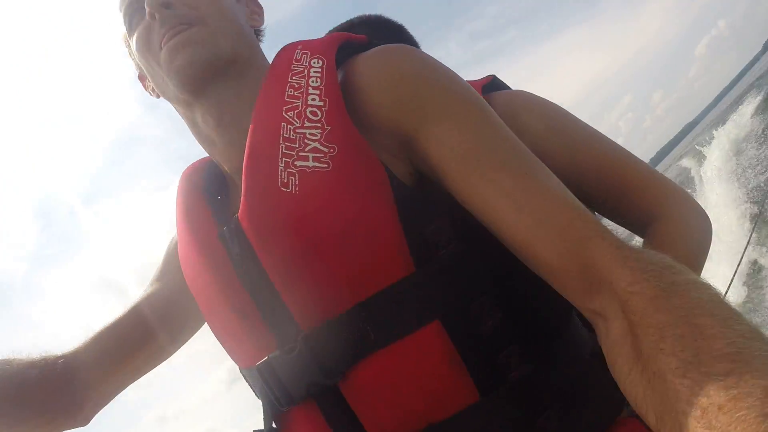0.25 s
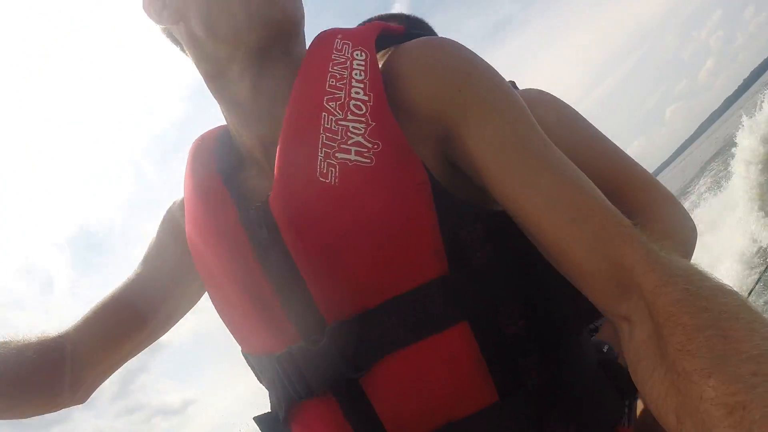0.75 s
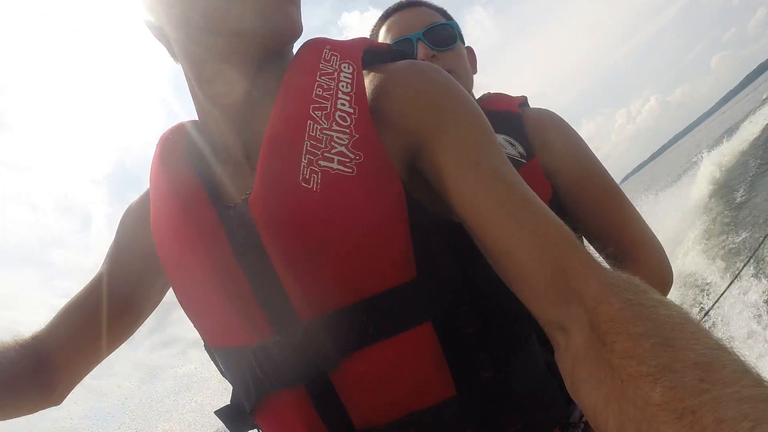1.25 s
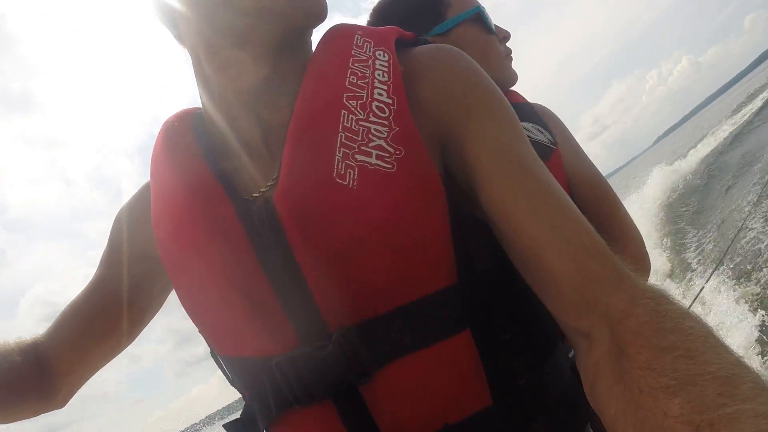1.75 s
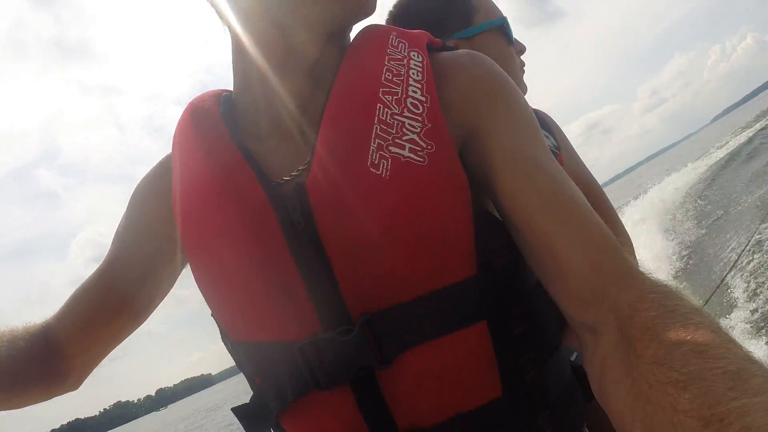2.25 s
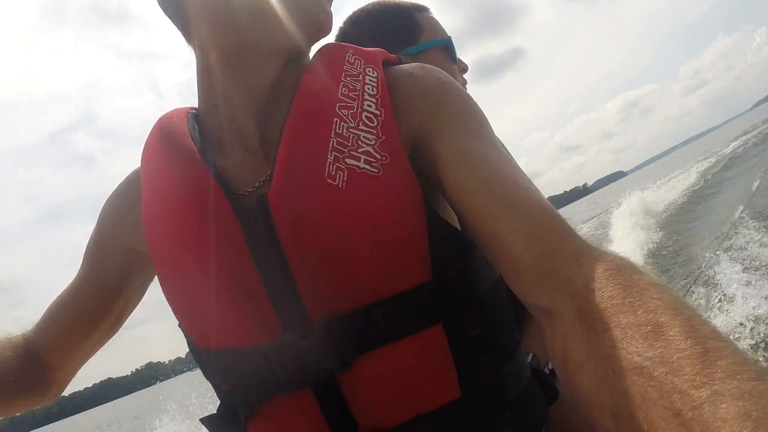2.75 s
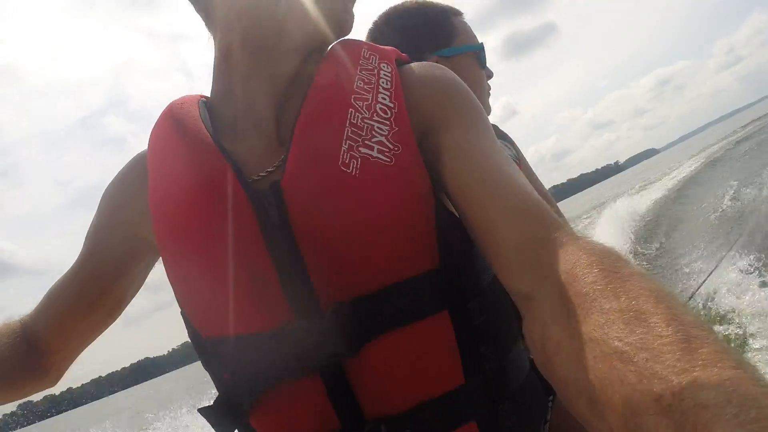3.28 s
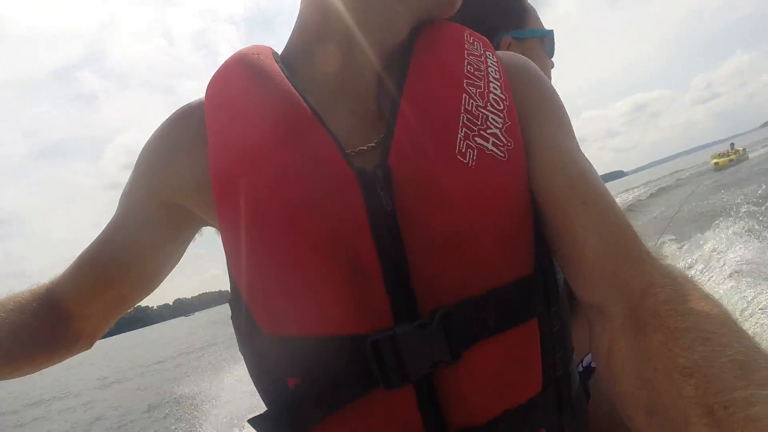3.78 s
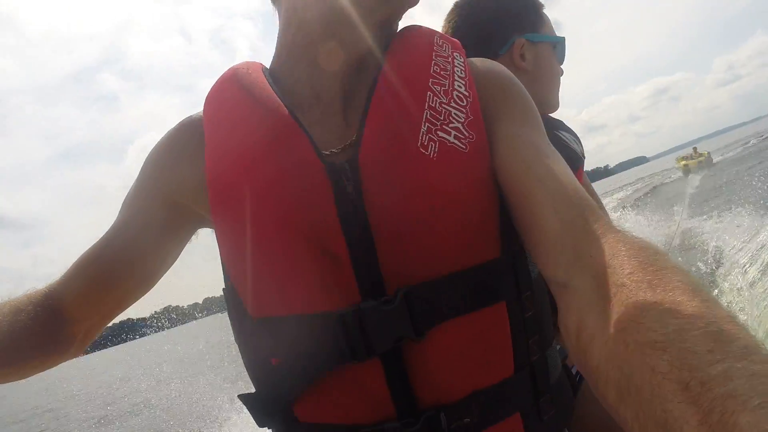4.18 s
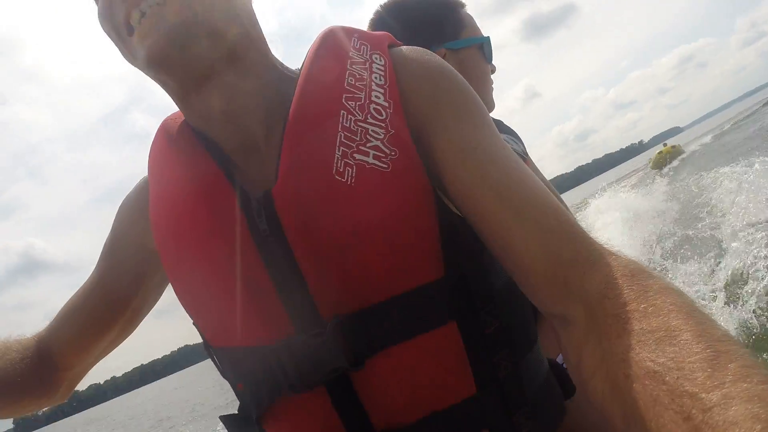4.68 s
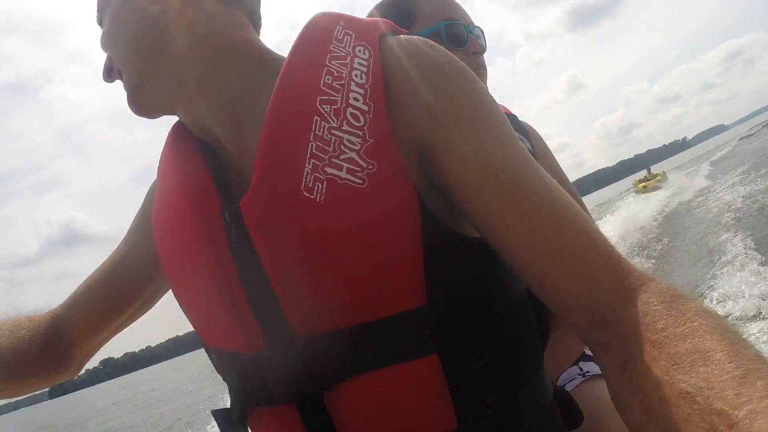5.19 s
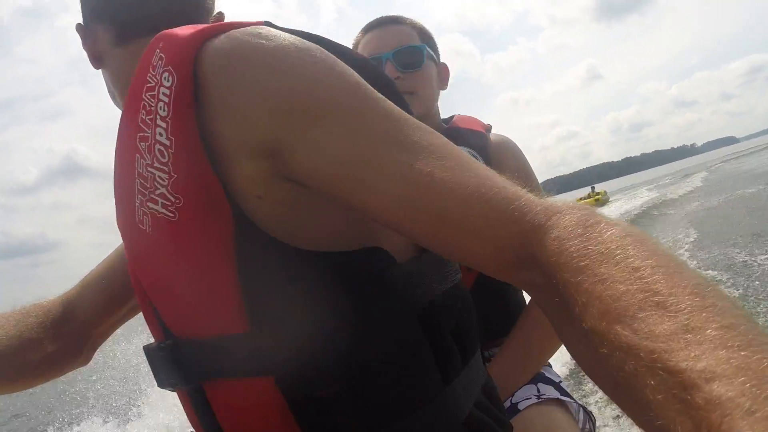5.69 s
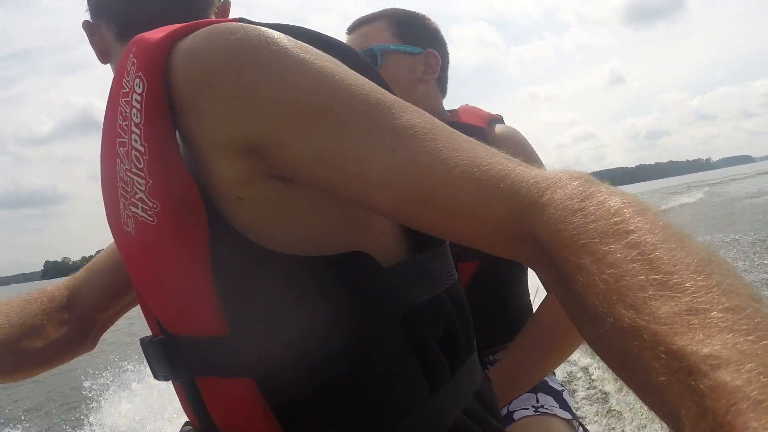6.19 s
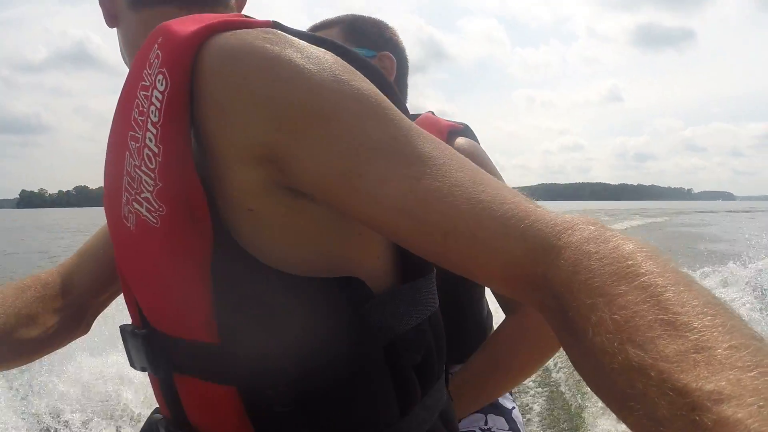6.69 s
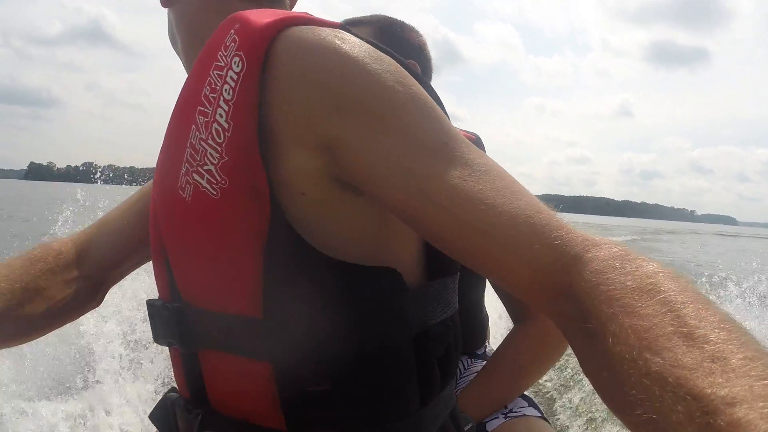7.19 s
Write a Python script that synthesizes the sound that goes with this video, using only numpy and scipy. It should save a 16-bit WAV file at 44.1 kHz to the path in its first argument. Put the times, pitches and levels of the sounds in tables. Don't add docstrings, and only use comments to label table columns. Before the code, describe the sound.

A rough, uneven water scooter engine growls at speed across a lake, its pitch wavering as hull panels boom, the mount rattles and wind thumps.

```python
import sys
import numpy as np
from scipy import signal
from scipy.fft import rfft, irfft
from scipy.io import wavfile
from scipy.ndimage import uniform_filter1d

SR = 44100
rng = np.random.default_rng(int(sys.argv[2]) if len(sys.argv) > 2 else 0)


def transcribe(u):
    v = np.clip(np.atleast_2d(u).T, -1, 1)
    q = np.round(v * 32767).astype(np.int16)
    wavfile.write(sys.argv[1], SR, q)


def level_to_linear(level):
    exponent = np.asarray(level, float) / 20
    return 10 ** exponent


N = 328104
TIME_S = np.arange(N) / SR

# peak_s, peak_db, half_width_s
GUSTS = [(.36, -18, 0.077), (.8, -15.5, 0.09), (.96, -24, 0.077), (1.58, -20, 0.19), (2.05, -19, 0.062),
         (2.37, -19.5, 0.056), (2.77, -21.5, 0.11), (2.95, -26.5, .04), (3.5, -26, .1), (3.7, -37, 0.052),
         (4.4, -23, 0.14), (4.73, -22, .04), (5.05, -21.5, 0.14), (5.55, -25.5, .12), (6.24, -24.5, .04),
         (6.77, -23, 0.022), (7.0, -28, .12), (7.35, -33, 0.037)]
# freq_hz, level_db (per Hz)
BUFFET_SPECTRUM = [(6, -26.5), (14, 0), (22, -1.5), (36, -3), (60, -21.5), (100, -40.5), (500, -120)]
# time_s, level_db
SPRAY_LEVEL = [(0, -55.5), (.64, -51.5), (.82, -54.5), (1.0, -53), (1.93, -51.5), (2.7, -51.5),
               (2.93, -56.5), (3.19, -53.5), (3.45, -53), (3.58, -54.5), (3.72, -53.5), (4.46, -52),
               (4.75, -53.5), (5.48, -51.5), (5.58, -55), (5.93, -57), (6.3, -54.5), (7.44, -52.5)]
# freq_hz, level_db (per Hz)
SHELL_SPECTRUM = [(2000, -24.5), (2500, 5.5), (3000, 6), (3300, -2.5), (4000, 0.5), (5000, -1),
                  (5800, -4.5), (6300, 1.5), (7200, -6), (8200, -7), (9100, -16), (10200, -12.5),
                  (11500, -17.5), (13200, -18.5), (15200, -30)]

# time_s, case_peak_db, bracket_peak_db, rise_fall_ms
KNOCKS = [(0.376, -45, -27, 4.8), (2.715, -33, -36, 4.4), (4.414, -27.5, -37, 5.75), (4.454, -43, -26, 4),
          (4.478, -37, -25, 2.84), (4.503, -42, -22, 2.1), (5.117, -38, -29, 2.6), (5.334, -45, -37, 2.4),
          (6.552, -27, -25.5, 3.5), (6.579, -17.5, -22, 2.87), (6.592, -24, -22, 3.8),
          (6.634, -34, -28, 5.3)]
# freq_hz, width_hz, level_db
BRACKET_MODES = [(504, 207, -8), (578, 142, -6), (696, 58, -5.5)]
CLAMP_MODES = [(900, 122, -0.5), (1093, 73, 0.5), (1250, 125, -2.5)]
CASE_MODES = [(1826, 163, 4), (2268, 270, -5), (1540, 290, -8), (1947, 100, -7)]
BRACKET_TOP_HZ, CLAMP_TOP_HZ, CASE_TOP_HZ = 800, 1580, 2680

# order, level_db, rise_db_per_hz (of cycle rate)
PANEL_ORDERS = [(7, -13.5, 0), (8, -1.5, 1), (9, -5.5, 0)]
# order, level_db
BRACKET_ORDERS = [(10, -2.5), (11, -7.5), (12, -1.5), (13, -3.5), (14, -8), (15, -7.5), (16, 3.5), (17, 0),
                  (18, -4)]
# freq_hz, level_db (per Hz)
SHUDDER_SPECTRUM = [(40, -28.5), (65, -8), (100, -12), (170, 1.5), (230, -8.5), (280, -9), (350, -8),
                    (420, -24), (1500, -110)]
# rest_db, then dB per dB of load, brightness, boom and spray,
# rise_db_per_hz (of cycle rate), slack_db (while the clamp is loose)
PART_LEVELS = [
    (-29.5, 0.66, 0, 0.88, 0.14, 0.73, -1),
    (-41.5, 0.88, 0, 0.079, .1, -0.5, -1),
    (-38, 0.41, 0.28, 0, 0.29, 0.5, 3.5),
    (-43, 0.3563, 0.64, 0.2, .9, 1, .6),
]

# start_s, length_s, load_db, case_brightness_db, panel_boom_db
WAVES = [(0, 0.324, 11.5, -3, -1.5), (0.527, 0.313, 10.5, 0, -2.5), (0.847, 0.313, 12, 0, -4.5),
         (1.19, 0.376, 0.5, -0.5, 2.5), (1.417, 0.091, 1.5, 3, -2.5), (1.655, 0.11, 8.5, -7, -4),
         (1.963, 0.16, 4, -3, -1), (2.287, 0.21, 5.5, -1, 1.5), (2.503, 0.12, -0.5, -3, 2.5),
         (2.71, 0.19, 8, 0.5, 1), (2.923, 0.13, -4, 2.5, 0), (3.084, 0.062, -0.5, 1, 3),
         (3.253, 0.304, 3.5, 2.5, -2), (3.56, 0.072, -4, 2.5, 0), (3.68, 0.11, 8.5, -2.5, -1.5),
         (3.833, 0.082, -4.5, 0, 6), (4.01, 0.47, 0.5, 3, 1.5), (4.33, 0.2156, 8.5, -2, -0.5),
         (5.054, 0.267, 3.5, -1, 1), (5.51, 0.348, 6, 0, 4), (5.865, 0.277, -2, -0.5, -2),
         (6.453, 0.14, 11.5, -1, 0.5), (6.635, 0.13, 6.5, -2, -1), (6.845, 1, 4.5, 1.5, -2.5)]

# peak_s, peak_db, half_width_s
JOLTS = [(.28, -26.5, 0.083), (.8, -30.5, 0.18), (1.3, -29.5, 0.22), (1.92, -25, 0.11), (2.3, -26, 0.12),
         (2.72, -30, 0.062), (3.0, -32, 0.086), (3.43, -23, 0.1), (3.78, -27.5, 0.26), (4.33, -32, 0.16),
         (5.02, -30.5, .15), (6.4, -31, .15), (6.87, -34.5, .12), (7.2, -29.5, 0.21)]
# freq_hz, level_db (per Hz)
LOW_SHAKE_SPECTRUM = [(25, -42.5), (55, 1.5), (75, 13), (100, 1.5), (140, -31.5), (600, -110)]
# time_s, cycle_rate_hz, level_db, firing_order_lean_db, cylinder_unevenness_db
ENGINE = [(0, 40.4, -14, 0.5, 3.5), (.3, 38.17, -12.5, 2.5, -2.5), (.55, 38.62, -11, 1, -4.5),
          (.85, 40.02, -16.5, 6.5, 2.5), (1.15, 40.75, -14, 2.5, -4), (1.95, 41.48, -12.5, -5.5, -2.5),
          (2.3, 38.98, -9.5, -2.5, -5), (2.7, 37.74, -11, 6, -1), (3.0, 38.72, -13, 3.5, 5),
          (3.5, 38.39, -11, 0, -2.5), (4.05, 39.17, -13, -0.5, 1.5), (4.3, 39.17, -9, 0, -2.5),
          (4.75, 37.68, -10.5, 3, -3), (5.25, 36.81, -11, 4, -2.5), (6.15, 38.5, -13.5, 2, 3),
          (6.4, 38.26, -13, 3.5, 3.5), (7.0, 39.02, -11.5, -2.5, -4), (7.44, 39.54, -11.5, -3, 3)]
# freq_hz, level_db
HULL_RESPONSE = [(110, -12.5), (116, -8), (124, 0), (148, -3), (158, -11), (166, -2.5), (190, -5),
                 (205, -17.5), (222, -7.5), (250, -4.5)]
# peak_s, half_width_s, firing_order_db, order_4_db, order_5_db
GRIP = [(.98, 0.14, -0.5, -12, -7), (1.1, 0.035, 2.5, 3, 9), (2.25, 0.066, 0, -12, -2),
        (2.52, .07, -3.5, 6.5, 4), (3.09, 0.12, -4.5, -11.5, -4), (3.42, 0.09, 4, -5, 2),
        (3.65, 0.082, -10, -6.5, -1), (3.78, 0.056, -8, 6.5, 4.5), (3.93, 0.15, 1.5, -7.5, -3.5),
        (4.5, 0.071, -1, 7.5, -0.5), (4.77, .07, 2, 1.5, -9), (5.19, 0.059, -2.5, 2, -2),
        (5.45, 0.069, 4, 2.5, -3), (5.7, 0.14, -6, -0.5, 0.5), (6.46, 0.07, -5.5, 0.5, -0.5),
        (6.88, 0.14, -1.5, 6, -3.5), (7.14, 0.13, -6, 0.5, -0.5)]
ORDER_LOAD = (0.055, 0.15, 0.35, 0.02)


def unit(x):
    return x / np.sqrt(np.mean(x ** 2))


def curves(table):
    s, *columns = np.transpose(table)
    return [np.interp(TIME_S, s, c) for c in columns]


def walk(rate_hz):
    k = int(SR / rate_hz)
    held = np.repeat(rng.standard_normal(N // k + 1), k)
    slewed = uniform_filter1d(uniform_filter1d(held, k), k)
    return unit(slewed[:N])


def coloured(spectrum):
    hz, db = np.transpose(spectrum)
    log_hz = np.log(np.arange(N // 2 + 1) * SR / N + 1e-3)
    gain = level_to_linear(np.interp(log_hz, np.log(hz), db))
    return unit(irfft(rfft(rng.standard_normal(N)) * gain, N))


def swells(rows, floor_db):
    bells = sum(level_to_linear(db) * np.exp(-((TIME_S - s) / w) ** 2) for s, db, w in rows)
    return 20 * np.log10(level_to_linear(floor_db) + bells)


def wind():
    thump_db = swells(GUSTS, floor_db=-29)
    return level_to_linear(thump_db) * unit(level_to_linear(0.55 * walk(34)) * coloured(BUFFET_SPECTRUM))


def spray(level_db):
    flicker_db = 0.5 * walk(25) + 0.93 * walk(200)
    return level_to_linear(level_db + 2.5) * unit(level_to_linear(flicker_db) * coloured(SHELL_SPECTRUM))


def waves():
    rise_s, fall_s = 0.025, 0.025
    total_db = 0
    for start, length, *db in WAVES:
        ramp = np.minimum((TIME_S - start) / rise_s, (start + length - TIME_S) / fall_s)
        total_db = total_db + np.clip(ramp + 0.5, 0, 1) * np.array(db)[:, None]
    return total_db


def knocks():
    tones_hz = CASE_MODES[0][0], CLAMP_MODES[-1][0], BRACKET_MODES[-1][0]
    case, clamp, bracket = (np.sin(2 * np.pi * hz * TIME_S) for hz in tones_hz)
    hits = 0
    for s, case_db, bracket_db, ms in KNOCKS:
        swell = np.exp(-((TIME_S - s) / (ms / 1000)) ** 2)
        hits = hits + swell * (level_to_linear(case_db) * case + level_to_linear(bracket_db) * (bracket + 0.71 * clamp))
    drop_s, drop_db, drop_width_s = 1.5055, -38, 0.0006
    tick = np.exp(-((TIME_S - drop_s) / drop_width_s) ** 2) * coloured(SHELL_SPECTRUM)
    return hits + level_to_linear(drop_db) * tick


def ring(x, modes, top_hz):
    rung = 0
    for k, (hz, width, db) in enumerate(modes):
        rung = rung + (-1) ** k * level_to_linear(db) * signal.lfilter(*signal.iirpeak(hz, hz / width, SR), x)
    return unit(signal.sosfilt(signal.butter(4, top_hz, fs=SR, output="sos"), rung))


def order_tone(turns, order, flutter_db, wander, bend=-0.35, lead=1.5):
    drift = wander * (walk(1.1) + 0.9 * walk(9))
    phase = 2 * np.pi * order * turns + lead + bend * (order - 4) ** 2 + drift
    return np.sqrt(2) * level_to_linear(flutter_db * walk(16)) * np.cos(phase)


def panel_hum(turns, revs, panel_db):
    tones = unit(sum(level_to_linear(db + rise * revs) * order_tone(turns, k, flutter_db=2.5, wander=0.3)
                     for k, db, rise in PANEL_ORDERS))
    return level_to_linear(panel_db - 1.5) * (tones + level_to_linear(3.5) * coloured(SHUDDER_SPECTRUM))


def bracket_rasp(turns, coupling_db):
    rasp = sum(level_to_linear(db) * order_tone(turns, k, flutter_db=2.5, wander=1.0) for k, db in BRACKET_ORDERS)
    return level_to_linear(coupling_db) * rasp


def clamp_rattle(turns, parts_db):
    sizes = rng.standard_normal(4 * int(turns[-1]))
    firing = 3 * turns
    beat = (0.89 + 0.23 * np.cos(2 * np.pi * firing)) * (1 + 0.097 * np.cos(2 * np.pi * turns))
    scrape = level_to_linear(0.35 * sizes[firing.astype(int)]) * beat * rng.standard_normal((3, N))
    modes = BRACKET_MODES, CLAMP_MODES, CASE_MODES
    tops_hz = BRACKET_TOP_HZ, CLAMP_TOP_HZ, CASE_TOP_HZ
    return sum(level_to_linear(db + 0.46 * walk(19)) * ring(x, m, top_hz)
               for db, x, m, top_hz in zip(parts_db, scrape, modes, tops_hz))


def order_levels(cycle_hz, level_db, lean_db, uneven_db, load_db):
    hz, db = np.transpose(HULL_RESPONSE)
    grip = sum(np.exp(-((TIME_S - s) / w) ** 2) * np.array(change)[:, None] for s, w, *change in GRIP)
    own_db = (lean_db + grip[0], uneven_db + grip[1], uneven_db - lean_db + grip[2], 0)
    return [level_db + np.interp((k + 3) * cycle_hz, hz, db) + own_db[k] + ORDER_LOAD[k] * load_db
            for k in range(4)]


def engine(turns, cycle_hz, orders_db):
    lead = (1.5, 1.5, 1.5 + 1.1 * np.clip(38 - cycle_hz, -1.5, 1.5), 1.5 + np.pi)
    flutter_db = (1.0, 1.0, 1.0, 0.75)
    main = sum(level_to_linear(db) * order_tone(turns, order=k + 3, flutter_db=f, wander=0.14, lead=a)
               for k, (a, db, f) in enumerate(zip(lead, orders_db, flutter_db)))
    shaft = level_to_linear(-5.0) * order_tone(turns, order=2, flutter_db=2.0, wander=1.0)
    shake_db = swells(JOLTS, floor_db=-41)
    return main + level_to_linear(shake_db) * (shaft + level_to_linear(-3.5) * coloured(LOW_SHAKE_SPECTRUM))


def scene():
    cycle_hz, *balance_db = curves(ENGINE)
    turns = np.cumsum(cycle_hz) / SR
    revs = cycle_hz - cycle_hz.mean()
    load_db, *colour_db = waves()
    spray_db = curves(SPRAY_LEVEL)[0]
    wet_db = spray_db + 54
    slack = np.exp(-(TIME_S / 0.9) ** 2)
    drives = [load_db, *colour_db, wet_db, revs, slack]
    panel_db, *mount_db = [rest + np.dot(share, drives) for rest, *share in PART_LEVELS]
    coupling_db = -52.5 + 0.9 * load_db + 1.5 * revs

    background = wind() + spray(spray_db)
    mount = knocks() + bracket_rasp(turns, coupling_db) + clamp_rattle(turns, mount_db)
    hull = panel_hum(turns, revs, panel_db)
    motor = engine(turns, cycle_hz, order_levels(cycle_hz, *balance_db, load_db))
    return (background + mount + hull + motor)[None]


def band_limit(x):
    return signal.sosfilt(signal.butter(12, 15200, fs=SR, output="sos"), x)


def record(dry):
    over = np.maximum(np.abs(dry) - 0.45, 0)
    rounded = dry - np.sign(dry) * (over - 0.4 * np.tanh(over / 0.4))
    return band_limit(rounded)


dry = scene()
out = record(dry)
transcribe(out)
```